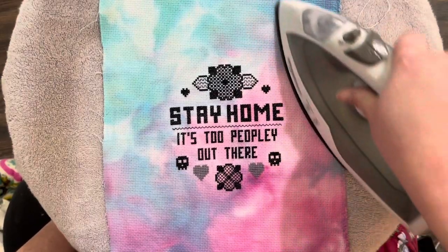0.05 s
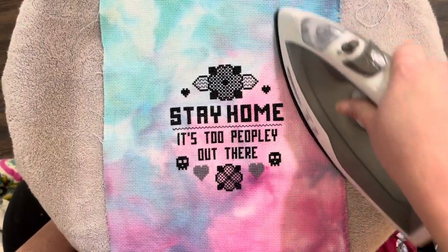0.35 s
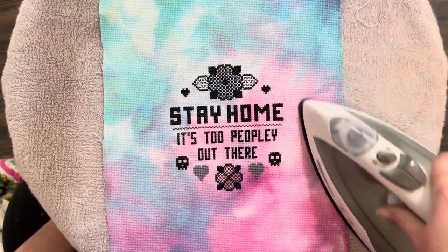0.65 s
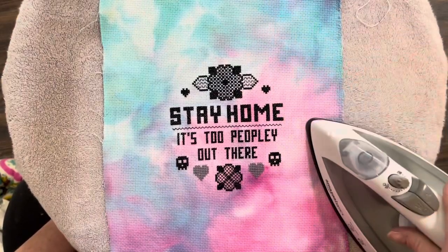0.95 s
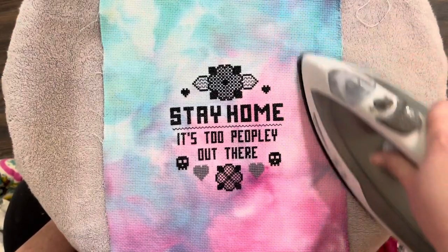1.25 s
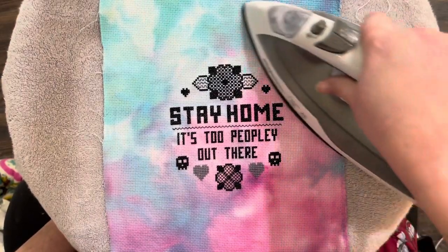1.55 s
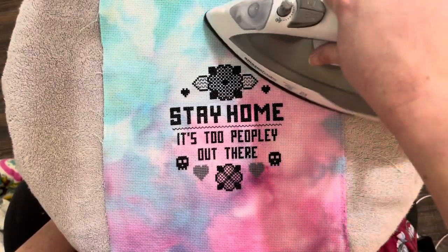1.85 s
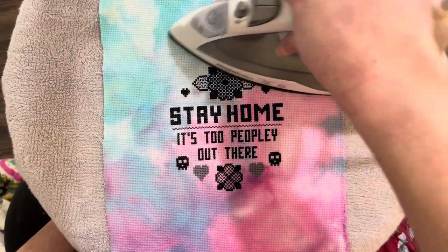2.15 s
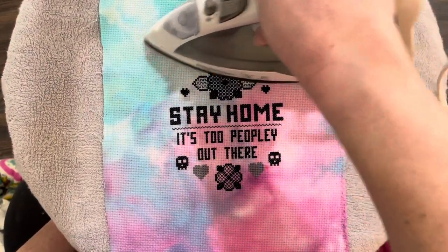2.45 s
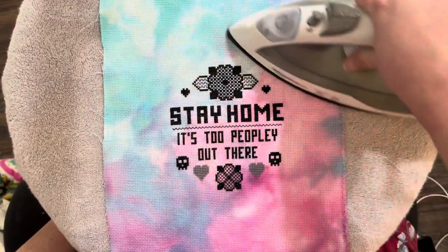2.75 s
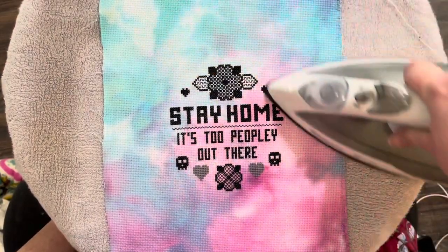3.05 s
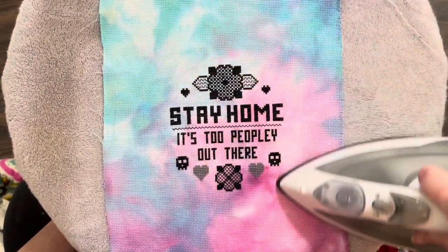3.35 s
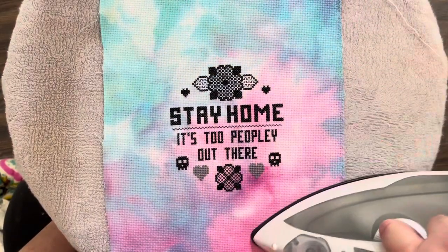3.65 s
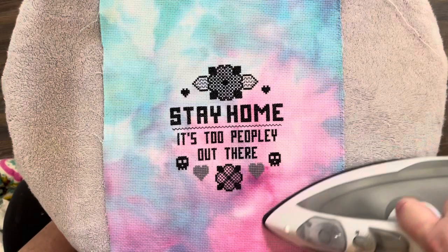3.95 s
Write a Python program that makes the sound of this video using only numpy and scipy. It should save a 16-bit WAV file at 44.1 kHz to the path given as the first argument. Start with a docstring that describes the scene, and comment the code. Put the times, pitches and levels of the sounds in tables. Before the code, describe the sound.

A clothes iron slides back and forth over cloth, hissing softly above a low room rumble.

```python
"""A clothes iron slides back and forth over a cloth spread on a towel, close by, in a small room.
The weave hisses under the soleplate and falls quiet at each turn. The hollow body of the iron adds a duller
rub, the padded board murmurs under its weight, the plate's edge scuffs the cloth, and a few light knocks
ring the shell. A steady low rumble, like ventilation, fills the room."""
import sys
import numpy as np
from scipy import signal
from scipy.fft import rfft, irfft
from scipy.io import wavfile

SR = 44100
rng = np.random.default_rng(int(sys.argv[2]) if len(sys.argv) > 2 else 0)


def generate_wav(sig):
    """Save sig (samples, or channels by samples) to the path in sys.argv[1] as 16-bit PCM at SR."""
    pcm = np.round(np.clip(np.atleast_2d(sig).T, -1, 1) * 32767).astype(np.int16)
    wavfile.write(sys.argv[1], SR, pcm)


N = 176400
TIME = np.arange(N) / SR
BINS_HZ = np.arange(N // 2 + 1) * SR / N
RUB_PAN_DB = 4

# how alike the iron sounds on left and right: f/Hz, likeness/0-1
IRON_LIKENESS = [(500, 0.94), (1200, 0.43), (1700, 0.17), (3000, 0.52), (6500, 0.41), (8000, 1), (15000, 1)]
# phase lead of the iron's right side: f/Hz, lead/rad
IRON_LEAD = [(200, -.2), (800, -1.1), (1300, -1.2), (2100, -.1), (3100, -.4), (5400, -.2), (6800, 1.1),
             (7900, 3.0), (8700, 3.3), (10600, 6.1), (12500, 6.5), (14200, 9.3)]
# light knocks on the shell: t/s, level/dB, centre f/Hz
KNOCKS = [(0.2443, -36.5, 1190), (1.872, -45, 1200), (1.9353, -35.5, 1100), (1.947, -43.5, 2090),
          (2.4765, -47, 990)]


def from_db(db):
    """Decibels to gain."""
    return 10 ** (np.asarray(db) / 20)


def unit_rms(x):
    """Scale to unit rms."""
    return x / np.sqrt(np.mean(x ** 2) + 1e-20)


def swing(rows):
    """A fader ride in dB about its median."""
    db = np.interp(TIME, *np.transpose(rows))
    return db - np.median(db)


def over_hz(points):
    """A table read at every frequency, on a log axis."""
    hz, value = np.transpose(points)
    return np.interp(np.log(BINS_HZ + 1e-9), np.log(hz), value)


def pan(db):
    """Stereo gains, with the left db above the right."""
    return from_db(np.array([[db], [-db]]) / 2)


def drift(rate_hz):
    """A slow random wander of unit rms."""
    return unit_rms(irfft(rfft(rng.standard_normal(N)) / (1 + (BINS_HZ / rate_hz) ** 2), N))


def white():
    """Three unrelated noises: shared, left, right."""
    return rng.standard_normal((3, N))


def colour(source, db_per_hz, likeness=IRON_LIKENESS, lead=IRON_LEAD):
    """Give shared, left and right noise a spectrum and a stereo image, by default the iron's."""
    spectra = rfft(source)
    alike = np.clip(over_hz(likeness), 0, 1)
    pair = np.sqrt(alike) * spectra[0] + np.sqrt(1 - alike) * spectra[1:]
    if lead is not None:
        pair = pair * np.exp(.5j * over_hz(lead) * np.array([[-1], [1]]))
    return irfft(pair * from_db(db_per_hz) * np.sqrt(SR / 2), N)


def dull(x, corner_hz):
    """Roll off the treble by 12 dB an octave."""
    return irfft(rfft(x) / np.sqrt(1 + (BINS_HZ / corner_hz) ** 4), N)


def ring(clicks, hz, t60):
    """One resonant mode: each click starts a decaying sine."""
    radius, angle = from_db(-60 / (t60 * SR)), 2 * np.pi * hz / SR
    return signal.lfilter([0, np.sin(angle)], [1, -2 * radius * np.cos(angle), radius ** 2], clicks + 1e-18)


def friction(snags_per_s=2500, spread_db=3.0, snag_share=0.28):
    """Smooth rubbing plus the tiny snaps of fibres that catch and let go."""
    sizes = from_db(spread_db * np.minimum(rng.exponential(1, (3, N)), 5))
    signs = rng.choice([-1, 1], (3, N))
    snags = unit_rms(sizes * signs * (rng.random((3, N)) < snags_per_s / SR))
    return np.sqrt(1 - snag_share) * white() + np.sqrt(snag_share) * snags


def in_room(x, t60=0.47, wet_db=-5.5):
    """The direct sound and a short diffuse tail on each side."""
    age = TIME[:SR // 2]
    tail = rng.standard_normal((2, len(age))) * np.exp(-np.log(1000) * age / t60)
    tail = tail / np.sqrt(np.sum(tail ** 2, axis=1, keepdims=True))
    return x + from_db(wet_db) * signal.fftconvolve(x[None], tail, axes=1)[:, :N]


def ventilation(wander_hz=1.994):
    """Room tone: a steady rumble with a wavering hum, and faint air above it."""
    # tones of the hum: f/Hz, level/dB
    hum_tones = [(67.5, -41), (160, -43), (180.5, -45), (483, -64)]
    # rumble with two broad humps: f/Hz, level/dB
    rumble_spectrum = [(20, -66), (36, -72.5), (45, -65.5), (53, -52), (70, -48.5), (95, -49), (112, -57),
                       (119, -56), (131, -65.5), (141, -51.5), (160, -51), (184, -52.5), (193, -63),
                       (218, -64), (230, -70), (400, -100.5)]
    # air of the room: f/Hz, level/dB
    air_spectrum = [(100, -88.5), (250, -75.5), (285, -76.5), (315, -72), (340, -77.5), (372, -74.5),
                    (420, -82.5), (520, -80), (580, -87.5), (740, -84), (820, -90.5), (1300, -95.5),
                    (1700, -96.5), (4000, -109)]
    # near mono in the bass, wide on top: f/Hz, likeness/0-1
    likeness = [(60, .97), (150, 0.91), (280, 0.78), (600, 0.3), (1300, 0.16), (6000, 0)]
    hum = 0
    for hz, db in hum_tones:
        pitch_hz = hz + wander_hz * drift(rate_hz=3.0)
        hum = hum + from_db(db) * np.sqrt(2) * np.sin(2 * np.pi * np.cumsum(pitch_hz) / SR)
    rumble = dull(colour(white(), over_hz(rumble_spectrum), likeness, lead=None), corner_hz=400)
    air = dull(colour(white(), over_hz(air_spectrum), likeness, lead=None), corner_hz=3200)
    return pan(-0.9) * (hum + rumble) + pan(1) * air


def board_rub():
    """The padded board murmurs where the iron bears down on it."""
    # low rub of the board: f/Hz, level/dB
    spectrum = [(220, -100), (300, -81.5), (380, -77), (480, -82), (600, -96), (1500, -150)]
    # its swells under the iron's weight: t/s, level/dB
    swells = [(0.0, -6.5), (0.8, -5.5), (0.92, 2.5), (1.2, 2), (1.4, -6), (2.75, -13.5), (3.5, -9.5),
              (3.8, -0.5), (3.95, -6)]
    level = from_db(np.interp(TIME, *np.transpose(swells)))
    return pan(RUB_PAN_DB) * level * colour(white(), over_hz(spectrum))


def shell_knocks(half_width_oct=0.35):
    """Each soft contact is a click with a colour of its own; it rings the modes of the shell."""
    # modes of the shell: f/Hz, level/dB, t60/s
    modes = [(877, -8.5, 0.03), (1050, -7, 0.0096), (1137, -8, 0.016), (1263, -9, 0.047),
             (1580, -5, 0.0094), (2360, -5.5, 0.03), (2700, -8, 0.04)]
    contacts = np.zeros(N)
    for start_s, db, centre_hz in KNOCKS:
        edges_hz = centre_hz * 2 ** (half_width_oct * np.array([-1, 1]))
        band = signal.butter(2, edges_hz, "band", fs=SR, output="sos")
        click = signal.unit_impulse(N, int(start_s * SR))
        contacts += from_db(db) * signal.sosfilt(band, click + 1e-18)
    ringing = sum(from_db(db) * ring(contacts, hz, t60) for hz, db, t60 in modes)
    return dull(ringing, corner_hz=1810)


def shell_bloom(delay_s=0.00296, attack_s=0.013):
    """A soft, low ring that swells and dies after the strongest knock."""
    # close, beating modes of the shell: f/Hz, level/dB, t60/s
    modes = [(544, -33, 0.17), (590, -45, 0.17), (500, -47, 0.12)]
    knock_s = max(KNOCKS, key=lambda row: row[1])[0]
    age = np.maximum(TIME - knock_s - delay_s, 0)
    ringing = sum(from_db(db - 60 * age / t60) * np.sin(2 * np.pi * hz * age) for hz, db, t60 in modes)
    return (1 - np.exp(-age / attack_s)) * ringing


def scuffs():
    """The edge of the soleplate catches the cloth: a burst of friction that swells quickly and dies away."""
    # catches: t/s, rise/s, level/dB, centre f/Hz, half-width/octaves
    catches = [(0.4532, 0.0026, -83, 1900, 0.42), (2.468, 0.017, -94, 2100, 0.55),
               (2.59, 0.055, -100.5, 2500, 0.45), (3.2, 0.07, -104, 2900, 0.5)]
    drive, bursts = friction(), 0
    for start_s, rise_s, db, hz, width_oct in catches:
        progress = np.maximum(TIME - start_s, 0) / rise_s
        band_db = db - 10 * np.log10(1 + (np.log2((BINS_HZ + 1) / hz) / width_oct) ** 6)
        bursts = bursts + progress * np.exp(1 - progress) * colour(drive, band_db)
    return pan(RUB_PAN_DB) * bursts


def body_rub(ride_depth=0.93, flutter_db=1.0, waver_db=0.3):
    """Friction heard through the hollow iron, broad and resonant; it carries on through the turns."""
    # dull, broad rub: f/Hz, level/dB
    spectrum = [(300, -87), (420, -84), (850, -91.5), (1200, -91.5), (1700, -99), (2300, -101),
                (3100, -103.5), (4500, -108), (5500, -107), (6200, -121)]
    # its fader ride: t/s, level/dB
    broad_ride = [(0.0, -53.5), (0.12, -58.5), (0.21, -60), (0.28, -60.5), (0.5, -59), (0.7, -56),
                  (0.84, -58.5), (0.95, -57), (1.19, -56.5), (1.3, -58.5), (1.55, -61.5), (1.8, -57),
                  (2.05, -59.5), (2.2, -59), (2.35, -57.5), (2.5, -58), (2.7, -58), (2.9, -59.5),
                  (3.3, -59), (3.68, -57), (3.85, -58), (3.95, -58)]
    # resonances of the shell under friction: f/Hz, half-width/Hz, level/dB
    resonances = [(1106, 80, -89.5), (1273, 70, -93), (2290, 92, -97.5), (3180, 92, -107), (4370, 70, -108),
                  (5460, 76, -109)]
    # their ride, highest where the iron is drawn near: t/s, level/dB
    hollow_ride = [(0.0, -1), (0.45, -1.5), (0.68, 1.5), (0.82, 0), (0.92, 5.8), (1.02, 4), (1.2, 5.5),
                   (1.3, -1), (1.55, -2), (1.85, 1), (2.3, -1.5), (2.55, -2), (2.95, -4), (3.2, -1),
                   (3.38, 2.5), (3.84, 3), (3.94, -2)]
    flutter = from_db(flutter_db * drift(rate_hz=15))
    broad = dull(colour(friction(), over_hz(spectrum)), corner_hz=6500)
    drive, hollow = friction(), 0
    for hz, width_hz, db in resonances:
        peak_db = db - 20 * np.log10(1 + ((BINS_HZ - hz) / width_hz) ** 2)
        waver = from_db(waver_db * drift(rate_hz=6))   # each swells on its own as the pressure shifts
        hollow = hollow + waver * colour(drive, peak_db)
    rub = from_db(ride_depth * swing(broad_ride)) * broad + from_db(swing(hollow_ride)) * hollow
    return pan(RUB_PAN_DB) * flutter * rub


def weave_hiss(ride_depth=0.95, flutter_db=0.1):
    """The weave hisses brightly under the soleplate, rising and falling with the speed of the stroke."""
    # sliding speed as a fader ride: t/s, level/dB
    strokes = [(0.0, -68), (0.1, -68.5), (0.18, -83), (0.27, -70), (0.52, -67), (0.74, -74.5), (0.88, -87),
               (0.98, -85.5), (1.08, -71.5), (1.35, -68.5), (1.62, -69.5), (1.95, -74.5), (2.19, -66.7),
               (2.3, -68.5), (2.375, -80), (2.46, -70), (2.85, -70), (3.2, -66), (3.62, -72), (3.79, -83),
               (3.92, -69.5)]
    # hiss of the weave at the usual speed: f/Hz, level/dB
    spectrum = [(1000, -108), (2500, -103), (3400, -103), (5000, -105), (6200, -106), (7500, -105.5),
                (8600, -106.5), (10000, -110), (12000, -114), (15500, -119)]
    level = from_db(ride_depth * swing(strokes) + flutter_db * drift(rate_hz=22))
    return pan(-1.5) * level * colour(friction(), over_hz(spectrum))


def scene():
    """The iron over the room tone; only the shell's knocks and bloom get reverb."""
    handling = in_room(shell_knocks() + shell_bloom())
    return ventilation() + weave_hiss() + body_rub() + board_rub() + scuffs() + pan(2.5) * handling


def record(dry, cutoff_hz=15750):
    """A steep low-pass trims the very top."""
    return signal.sosfilt(signal.ellip(10, .1, 80, cutoff_hz, fs=SR, output="sos"), dry)


dry = scene()
out = record(dry)
generate_wav(out)
```